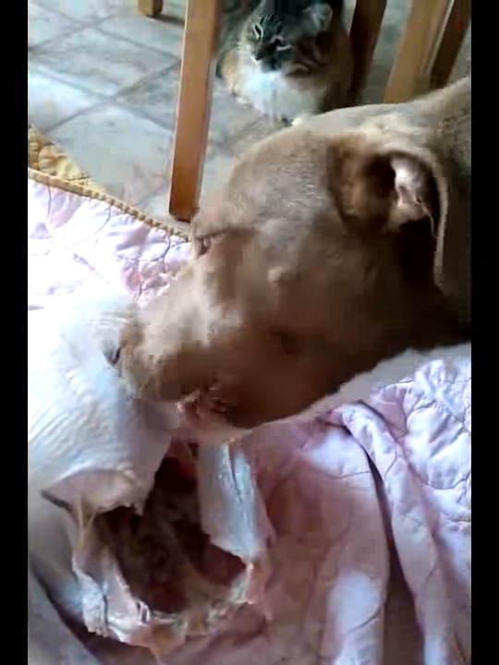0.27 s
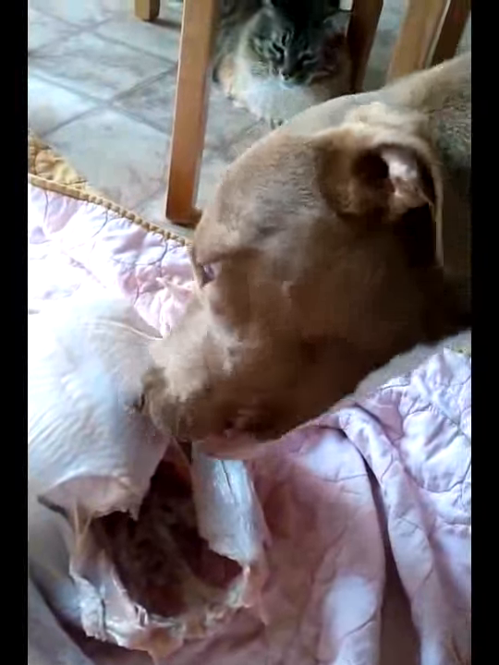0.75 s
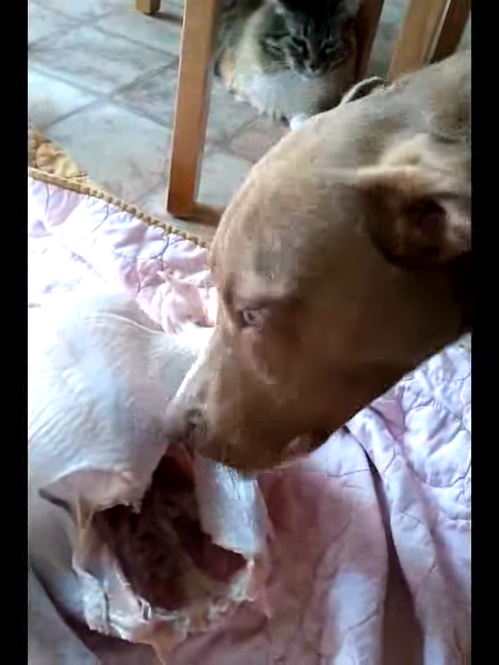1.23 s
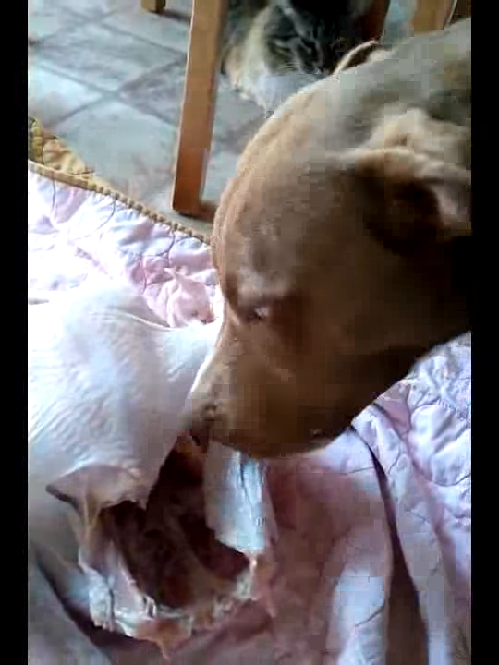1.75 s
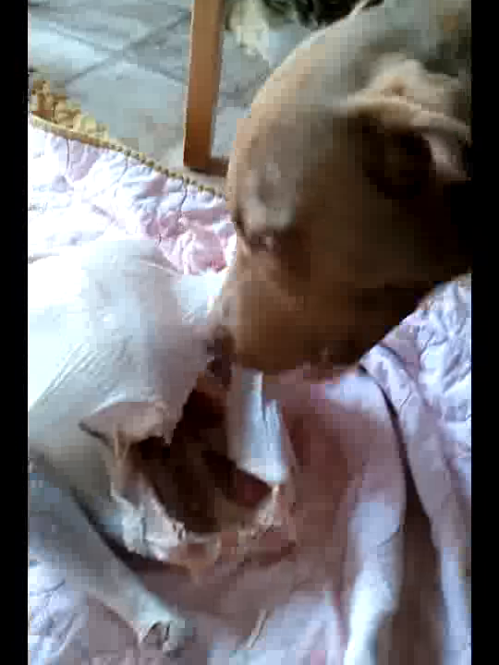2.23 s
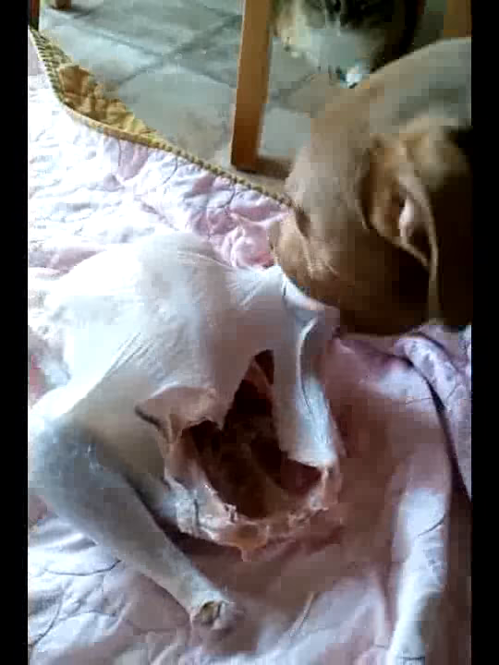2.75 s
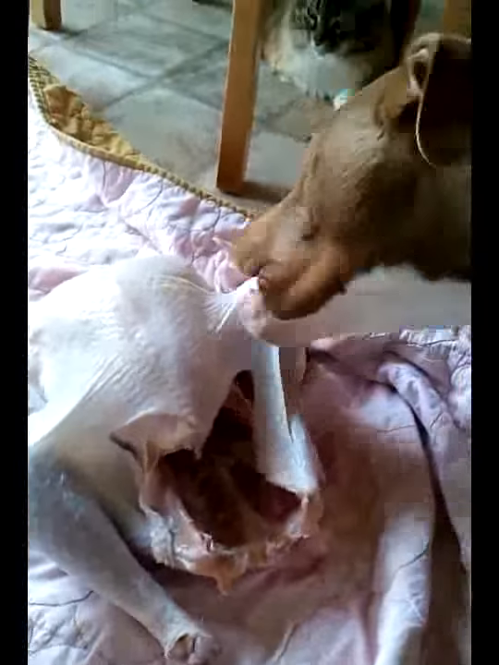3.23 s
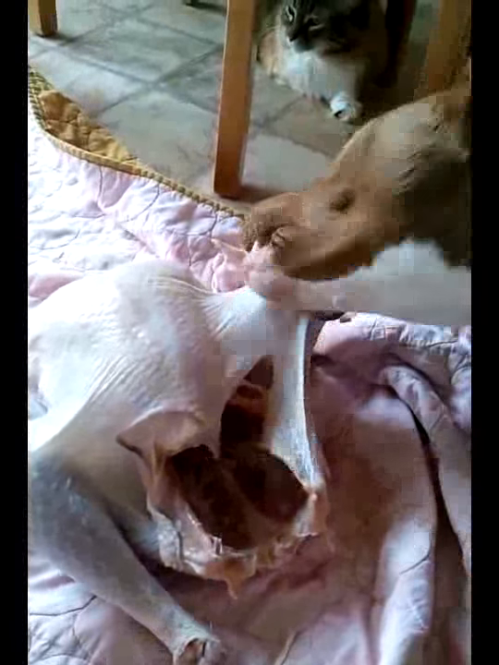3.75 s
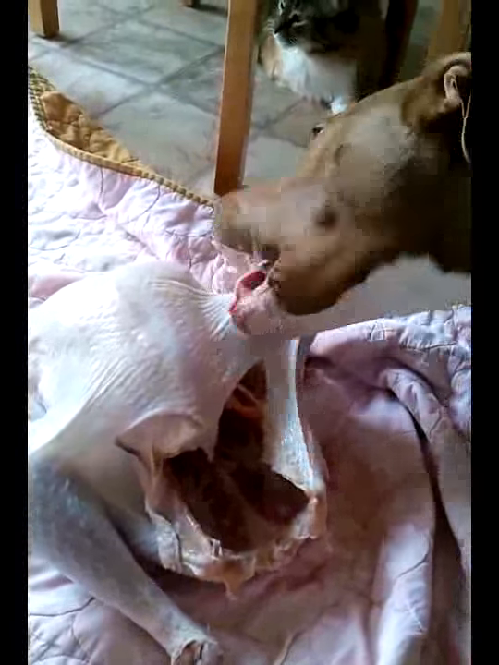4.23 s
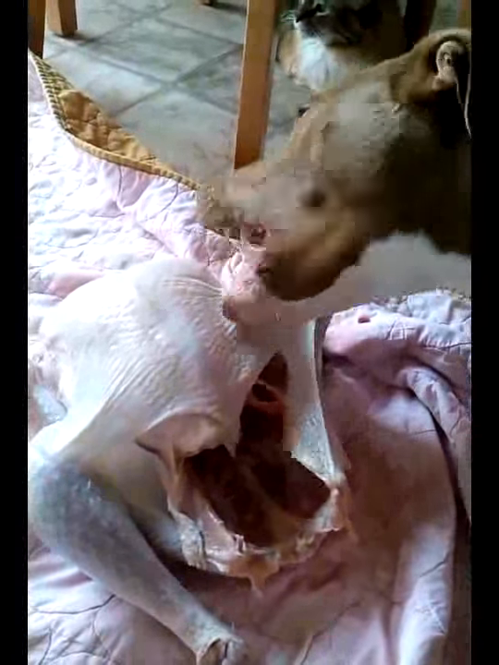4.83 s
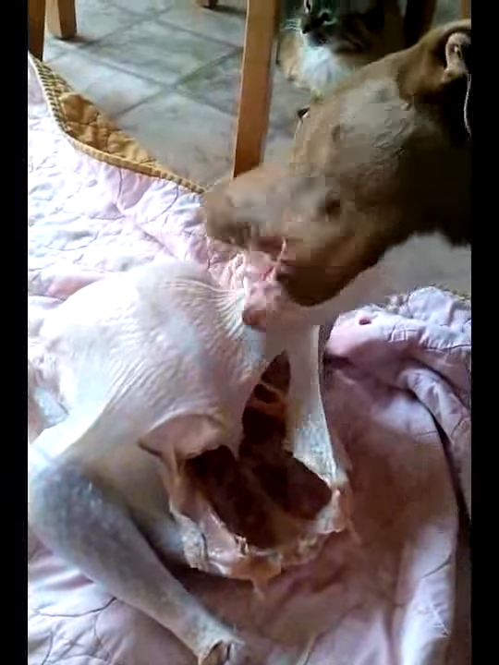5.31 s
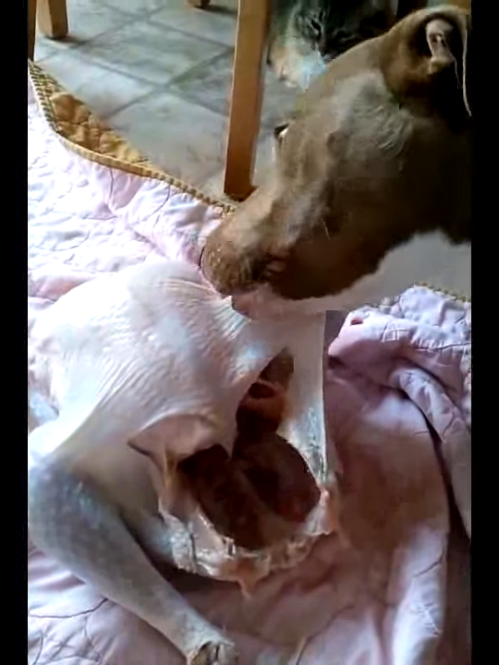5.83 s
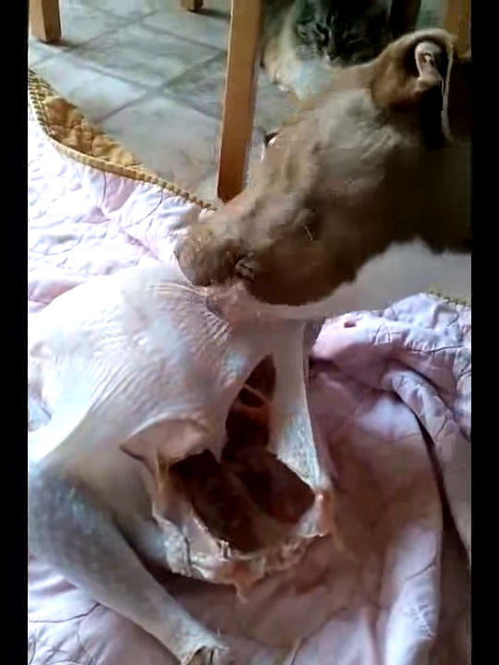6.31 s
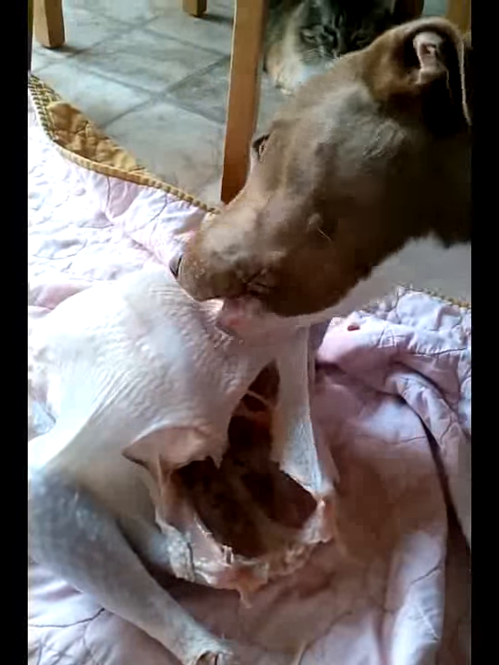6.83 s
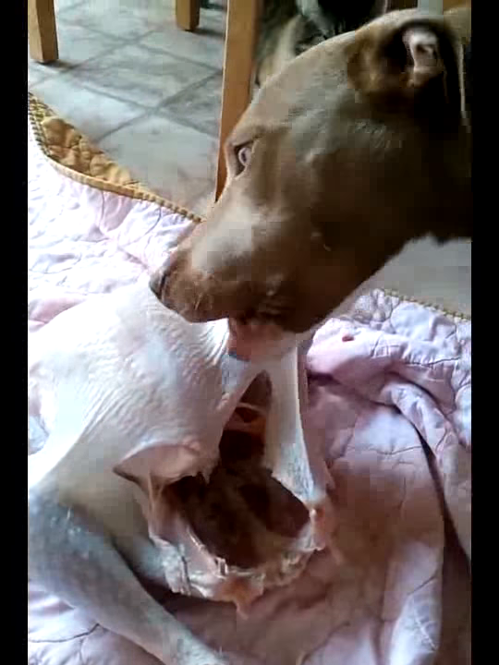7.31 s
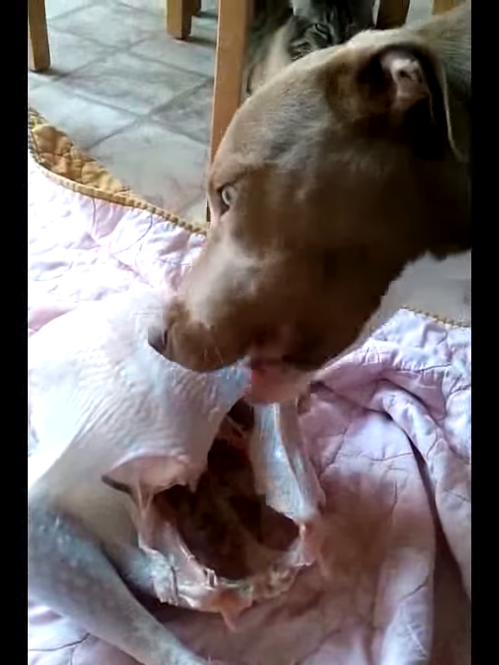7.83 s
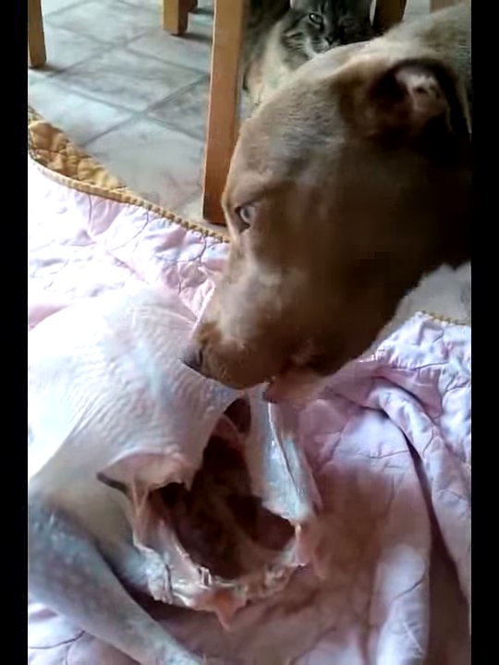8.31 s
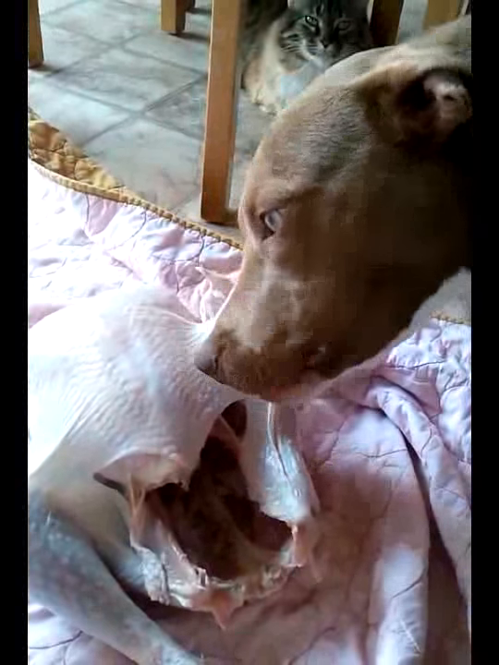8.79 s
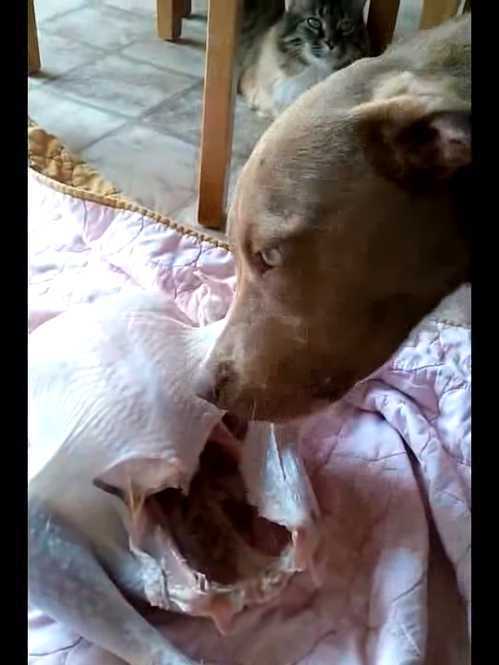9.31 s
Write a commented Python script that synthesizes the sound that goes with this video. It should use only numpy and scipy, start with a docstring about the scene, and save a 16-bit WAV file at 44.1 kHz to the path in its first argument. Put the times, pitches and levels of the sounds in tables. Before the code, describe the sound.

A dog's mouth works at raw meat and bone: bright, dry clicks, hollow lip smacks, fizzing wet crackle and squelches. Loud splintering snaps distort the small microphone at the start and in clusters around the middle, with short tile echoes. A brief thin, raspy squeak rises in the background. Later the smacking grows busier, without big cracks, over soft room noise and a gently pulsing mains hum.

```python
"""Dog gnawing raw poultry

A dog gnaws raw poultry on a quilt in a tiled kitchen, close to a phone. Bones crack and overload
the phone, lips and tongue smack: noise puffs ring resonances. Wet meat crackles: random pops.
A squeak glides up across the room: swept sines and rasp. Mains hum beats over shaped room noise."""
import sys
import numpy as np
from scipy import signal
from scipy.fft import rfft, irfft
from scipy.io import wavfile
from scipy.ndimage import uniform_filter1d

SR = 44100
rng = np.random.default_rng(int(sys.argv[2]) if len(sys.argv) > 2 else 0)


def put_to_file(sound):
    """Save the sound as 16-bit audio at rate SR, in the file named by the first command-line argument."""
    columns = np.atleast_2d(sound).T  # one column per channel
    safe = np.clip(columns, -1, 1)
    whole_steps = np.round(safe * 32767)
    wavfile.write(sys.argv[1], SR, whole_steps.astype(np.int16))


N = 421155  # samples

# Levels are ahead of mixing and microphone; PORT_DB is added where noted in the code.
# Bone cracks: t/s, splinter peak/dB, splinter f/Hz, mouth f/Hz, mouth re splinter/dB,
# thud re splinter/dB, bone ring re splinter/dB, decay constant/ms
BONE_CRACKS = [(0.0455, 7, 4900, 1390, -23, -15.5, -4, 3.7), (0.0962, 7.5, 5100, 840, -18.5, -28, -23, 3.1),
               (0.1675, 10.5, 5100, 1806, -19.5, -26.5, -38, 2.6),
               (1.35, -3.5, 6200, 1690, -12, -12.5, -34, 2.2),
               (4.2608, 6.5, 5100, 1370, -9.5, -17.5, -15, 2.4),
               (4.2845, 4.5, 5200, 1267, -9.5, -17, -14, 3.3),
               (5.252, 8.5, 6080, 1300, -25.5, -30.5, -30, 2.4),
               (5.2787, 10, 4900, 1330, -13.5, -25.5, -14, 4), (5.324, 9, 5200, 1250, -21, -29, -15, 3.2),
               (5.362, 1, 4960, 1030, -27, -50, -26, 1.5), (5.3833, 11, 4500, 1220, -12, -28, -28, 3.6),
               (5.457, 5.5, 4600, 915, -2.5, -14, 3, 1.41), (5.656, 8, 5260, 1880, -33, -39, -21.5, 10),
               (6.0316, 9.5, 5760, 1284, -20.5, -34.5, -21.5, 2.25),
               (6.0417, 4, 4550, 1280, -19.5, -28, -31, 3), (7.3119, -12.5, 4300, 1250, -14, -4, -36, 2.5),
               (7.3256, 9.5, 4810, 1670, -23.5, -37, -46, 1.5)]
# Smacks and tooth clicks: t/s, click peak/dB, mouth f/Hz, mouth level/dB, decay constant/ms
MOUTH_SMACKS = [(0.244, -29, 2570, -18, 2), (0.345, -23.5, 1260, -48, 6), (0.395, -26, 1700, -42, 3),
                (0.446, -31, 1380, -34, 1.6), (0.543, -41, 507, -27.5, 4), (0.565, -34, 577, -33, 1.2),
                (0.681, -26.5, 600, -43, 3), (0.726, -25, 600, -53, 2.6), (0.746, -28, 600, -60, 1.1),
                (0.752, -18, 374, -55, 3.3), (0.902, -26, 1700, -39, 11.5), (1.032, -23.5, 2520, -33, 1.6),
                (1.127, -29, 3020, -38, 3.7), (1.217, -21.5, 1250, -26.5, 1.3),
                (1.267, -40, 1230, -29, 3.6), (1.275, -46, 546, -31.5, 8.2), (1.358, -27, 2670, -18, 0.98),
                (1.381, -33, 2580, -28, 5), (1.49, -52, 2440, -33, 3.5), (1.538, -28.5, 2620, -39.5, 3.8),
                (1.645, -30, 1170, -41, 4), (1.74, -28, 597, -40.5, 14), (1.798, -26, 600, -55, 3.9),
                (1.877, -24, 524, -32.5, 2.2), (1.922, -18, 295, -38.5, 3.3), (1.947, -29, 595, -48, 1.7),
                (1.964, -35, 2300, -34, 18), (1.988, -18.5, 2200, -32.5, 3.9), (2.056, -44, 1130, -34, 5.5),
                (2.135, -26, 620, -55, 1.9), (2.18, -25, 610, -42, 4.2), (2.451, -23, 283, -34.5, 4.8),
                (2.461, -19, 316, -36, 5.8), (2.472, -32, 1770, -32, 16), (2.525, -20.5, 1820, -43, 3.6),
                (2.889, -40, 646, -32, 6.2), (2.901, -27, 613, -55, 5.8), (3.375, -41, 2880, -37.5, 1.5),
                (3.552, -31, 457, -42.5, 7.1), (3.606, -17, 540, -43, 2.5), (3.629, -14, 1430, -25.5, 0.78),
                (3.706, -23, 600, -58, 3.8), (3.737, -19.5, 600, -54, 3.4), (3.78, -20.5, 530, -55, 2.7),
                (3.875, -20.5, 600, -46, 1.4), (4.109, -24.5, 440, -54, 2.1), (4.122, -14, 1500, -51, 1),
                (4.146, -22, 1260, -27.5, 1.2), (4.236, -7, 1390, -22, 1.3), (4.385, -25, 2570, -26, 4.8),
                (4.484, -22, 1200, -71, 2), (4.565, -15.5, 600, -52, 2.6), (4.659, -12.5, 600, -42, 0.98),
                (4.703, -21, 1200, -35.5, 15), (4.753, -22, 1190, -35.5, 5.1),
                (4.777, -23, 1300, -36.5, 14), (4.903, -16.5, 2820, -48, 3.7),
                (4.982, -21.5, 397, -47, 3.1), (5.028, -20.5, 545, -48, 2.8),
                (5.131, -52, 1080, -32.5, 5.2), (5.175, -24, 654, -40, 2.1), (5.187, -16.5, 1380, -36, 2.3),
                (5.223, -12, 1290, -25.5, 2.3), (5.815, -26, 600, -54, 2.4), (5.844, -25, 600, -64, 0.83),
                (5.855, -26, 600, -58, 1.1), (5.922, -22.5, 363, -47, 6.4), (5.992, -46, 1380, -27, 3.4),
                (6.017, -11, 1380, -36, 2.2), (6.025, -7, 1370, -17, 2.5), (6.106, -10.5, 1360, -47, 2.7),
                (6.187, -12, 370, -44, 1), (6.215, -21, 600, -54, 1.5), (6.324, -16.5, 600, -47, 4.5),
                (6.393, -27, 1210, -32, 2.8), (6.417, -23, 1340, -57, 1.7), (6.431, -22, 1320, -28, 3.3),
                (6.438, -16, 1280, -31, 5.3), (6.46, -28, 1300, -36, 4.3), (6.486, -10, 1300, -40, 1.5),
                (6.499, -18, 1300, -42, 1.5), (6.581, -21, 613, -43.5, 1.8), (6.591, -19, 420, -46, 2.1),
                (6.623, -13.5, 600, -58, 1.7), (6.705, -23, 600, -53, 2.4), (6.714, -14.5, 1080, -39, 3.2),
                (6.735, -27, 2030, -28.5, 5.8), (6.768, -20, 2000, -42, 1.9), (6.836, -22, 1100, -44, 3.3),
                (6.849, -15.5, 1260, -31, 4.8), (6.879, -11, 630, -33, 5.2), (6.918, -14, 1380, -24, 2.9),
                (6.948, -24, 600, -48, 2.6), (6.992, -6.5, 600, -50, 2.1), (7.07, -16.5, 1260, -48, 3.8),
                (7.131, -14.5, 1160, -40, 7.6), (7.16, -31, 2700, -29.5, 5.6), (7.195, -40, 1210, -26, 3.1),
                (7.221, -20.5, 600, -46, 6.7), (7.255, -22, 595, -52, 3.9), (7.273, -11.5, 600, -49, 3),
                (7.495, -29, 2920, -30.5, 9.8), (7.545, -16, 1170, -35.5, 3.4),
                (7.585, -20, 1090, -44, 4.4), (7.597, -43, 1130, -33.5, 4.3),
                (7.624, -17.5, 1230, -64, 1.8), (7.703, -17.5, 510, -23.5, 2.3),
                (7.725, -26, 1470, -27, 15), (7.751, -5, 605, -29.5, 2.7), (7.779, -15.5, 2800, -30.5, 12),
                (7.902, -17.5, 600, -51, 2.6), (7.919, -17, 600, -52, 1.9), (7.93, -11.5, 1260, -37, 4.1),
                (7.943, -14.5, 1430, -31, 6.6), (7.982, -23, 1390, -28.5, 5.9), (8.073, -23.5, 600, -44, 5),
                (8.13, -19, 1470, -22, 16), (8.156, -14.5, 1570, -40, 5.9),
                (8.278, -28.5, 2040, -35.5, 4.9), (8.373, -20, 720, -36.5, 2.1),
                (8.402, -25, 400, -53, 1.1), (8.417, -9.5, 606, -51, 2.3), (8.494, -20, 1310, -25.5, 8.5),
                (8.606, -11, 600, -57, 4), (8.734, -22.5, 1210, -34.5, 3.7), (8.789, -22, 392, -43, 2.3),
                (8.868, -34, 1250, -34, 5.1), (8.878, -16.5, 1310, -27, 55), (8.903, -10.5, 1380, -44, 1.3),
                (8.931, -16, 565, -43, 2.3), (8.971, -27.5, 2190, -25.5, 10), (9.074, -19.5, 1280, -46, 12),
                (9.2, -20.5, 594, -55, 1.1), (9.293, -26, 606, -49, 11), (9.371, -16.5, 574, -29, 2.2),
                (9.383, -17.5, 390, -56, 5.1), (9.471, -19.5, 600, -59, 1.3), (9.487, -16.5, 600, -57, 1.9),
                (9.538, -16, 2220, -42, 2.3)]
# Wet crackle between the smacks: t/s, level/dB
WET_LEVELS = [(0, -56.5), (.13, -38), (.5, -58), (.9, -56), (2.05, -48.5), (2.8, -58), (3.14, -44),
              (3.32, -60.5), (3.56, -48), (3.85, -60), (4.2, -44), (4.5, -51.5), (5.1, -48.5),
              (5.38, -33.5), (5.8, -51.5), (6.12, -37), (6.3, -52), (7.5, -48.5), (8.16, -53.5),
              (9.55, -52)]
# Squelches, wet grain in the hollow of the mouth: t of maximum/s, level/dB,
# swell per 20 dB/ms, sink per 20 dB/ms
MOUTH_SQUELCHES = [(.09, -27, 42, 243), (.18, -39.5, 56, 37), (1.28, -38, 110, 18), (1.36, -41, 44, 200),
                   (2.07, -44.5, 896.5, 93), (2.5, -44, 120, 40), (2.9, -32.5, 31.5, 29),
                   (3.64, -45, 400, 165), (4.15, -33, 27, 100), (4.28, -32, 36, 112), (4.76, -42, 424, 408),
                   (5.13, -42, 98, 64), (5.29, -31, 81, 140), (5.4, -34, 87, 34), (5.45, -33, 94, 117),
                   (6.04, -27, 66, 60), (6.44, -41, 183, 65), (6.91, -42, 461, 115), (7.21, -39.5, 197, 90),
                   (7.33, -29.5, 28.5, 85), (7.61, -34.5, 173, 16), (7.74, -37, 103, 144),
                   (7.98, -58, 296, 64), (8.141, -24, 23, 33), (8.48, -40.5, 137, 82),
                   (8.87, -39, 272.5, 160), (9.39, -47, 300, 150)]
# Squeak glide: t/s, f/Hz, level/dB, rasp re level/dB
SQUEAK_GLIDE = [(2.99, 1334, -60, -11), (3.018, 1465, -44.5, -21), (3.05, 1777, -41.5, 1),
                (3.084, 2300, -42.5, 5.5), (3.11, 2825, -37, -2), (3.14, 3000, -30, -21),
                (3.18, 2984, -35, -6.5), (3.24, 2990, -46, -5), (3.298, 2990, -63, 2)]
# Squeak partials: multiple of the pitch, level re fundamental/dB
SQUEAK_PARTIALS = [(1, 0), (2, -13), (3, -13)]
# Rasp bands of the squeak: f/Hz, width/Hz, relative level/dB
RASP_BANDS = [(2200, 930, -4), (3740, 1100, -5), (5050, 450, -8.5)]
# Hum tones: f/Hz, RMS level/dB
HUM_TONES = [(118.4, -54), (240, -68.5), (300, -64.5), (360, -59.5)]
# Room noise spectrum: f/Hz, relative density/dB
AIR_SPECTRUM = [(25, -29), (64, -7.5), (100, -14), (170, 0), (250, -7), (370, -4), (600, -6), (1000, -13),
                (2000, -14), (3100, -22.5), (5400, -30), (9000, -26.5)]
# Echo of the tiles by band: f/Hz, t60/s, relative level/dB
ROOM_BANDS = [(268, 0.41, 4.5), (600, 0.19, 8), (1190, 0.35, -1.5), (2230, 0.38, 2), (3300, .22, 1),
              (5200, 0.1, -2.5), (8460, 0.17, 2.5)]

AIR_DB = -52
BEAT_PERIOD_S, BEAT_TOP_S, BEAT_SHARE = 0.671, 0.575, 0.42
# Echo patterns crossfade at a steady pace: slowly for mouth, wet sounds and squeak,
# quickly for cracks, whose echo is diffuse
ECHO_PATTERNS, SLOW_TURN_S, QUICK_TURN_S = 8, 0.05, 0.0015
CRACK_ECHO_DB, MOUTH_ECHO_DB, WET_ECHO_DB = -11, -8, -11
SQUEAK_DIRECT_DB, SQUEAK_ECHO_DB = -11, 9.5
# Bubbles in the spit (per fizz band), larger ones in the hollow of the mouth
FIZZ_PER_S, GURGLE_PER_S = 1500, 260
CLICK_HZ, CLICK_LOG_SPREAD = 5030, 0.051
# Faint smacks: click level re the clear smack, floor before the spread, mouth re click
TICKS, TICK_SCATTER_S, TICK_MS = 130, 0.017, 3.6
TICK_DB, TICK_FLOOR_DB, TICK_SPREAD_DB, TICK_MOUTH_DB = -11, -39.5, 0.5, -21.5
# Port: sound outside its resonances is PORT_DB stronger at the source
PORT_LOW_HZ, PORT_LOW_WIDTH_HZ, PORT_LOW_DB = 4480, 270, -7.5
PORT_HIGH_HZ, PORT_HIGH_WIDTH_HZ, PORT_DB = 5286, 1260, 10.5
EDGE_HZ, TOP_HZ = 9000, 16300


def undb(db):
    """dB to amplitude ratio."""
    return 10 ** (np.asarray(db) / 20)


def unit(x):
    """Scale to RMS 1."""
    return x / np.sqrt(np.mean(x ** 2))


def band(x, hz, width_hz):
    """Resonance with gain 1 at its centre."""
    return signal.lfilter(*signal.iirpeak(min(hz, 0.45 * SR), hz / width_hz, fs=SR), x)


def low_pass(x, order, hz):
    """Butterworth low-pass."""
    return signal.sosfilt(signal.butter(order, hz, fs=SR, output="sos"), x)


def burst(noise, decay_ms, hz, q, skirt):
    """A puff of noise swells, dies and rings one steep resonance with a broad skirt; peak 1."""
    t = np.arange(len(noise)) / (SR * max(decay_ms, 0.1) / 1000)  # in decay constants
    puff = noise * np.exp(-t) * (1 - np.exp(-t / 0.05))
    broad = band(puff, hz, hz / 1.02)
    ring = band(broad, hz, hz / q) + skirt * broad
    return ring / np.abs(ring).max()


def add(out, t_s, x):
    """Mix x into out from t_s, cut at the end."""
    i = int(t_s * SR)
    out[i:i + len(x)] += x[:len(out) - i]


def air():
    """Steady room noise: white noise shaped over log frequency."""
    hz, db = np.transpose(AIR_SPECTRUM)
    f = np.maximum(np.arange(N // 2 + 1) * SR / N, 1)
    gain = undb(np.interp(np.log(f), np.log(hz), db))
    return undb(AIR_DB) * unit(irfft(rfft(rng.standard_normal(N)) * gain, N))


def hum():
    """Mains overtones; the lowest has a close neighbour, so it swells and sinks."""
    t = np.arange(N) / SR
    tones = [np.sqrt(2) * undb(db) * np.exp(2j * np.pi * hz * t) for hz, db in HUM_TONES]
    neighbour = BEAT_SHARE * np.exp(2j * np.pi * (t - BEAT_TOP_S) / BEAT_PERIOD_S)
    tones[0] = tones[0] * (1 + neighbour)
    return sum(tones).imag


def room(x, turn_s):
    """Diffuse echo of the tiles: noise dying band by band; patterns crossfade every turn_s."""
    t = np.arange(SR // 2) / SR
    turn = np.arange(N) / SR / turn_s
    out = 0
    for k in range(ECHO_PATTERNS):
        tail = 0
        for hz, t60_s, db in ROOM_BANDS:
            noise = band(rng.standard_normal(len(t)), hz, 0.54 * hz)
            tail = tail + undb(db - 60 * t / t60_s) * noise
        tail = tail * np.clip((t - 0.002) / 0.0078, 0, 1)  # starts after the first wall
        tail = tail / np.sqrt(np.sum(tail ** 2))
        distance = np.minimum(np.abs((turn - k) % ECHO_PATTERNS - 1), 1)
        share = np.cos(np.pi / 2 * distance)
        out = out + signal.fftconvolve(share * x, tail)[:N]
    return out


def squeak():
    """A thin whistle with overtones glides up and holds, with a breathy rasp around it."""
    t = np.arange(N) / SR
    t_s, hz, db, rasp_db = np.transpose(SQUEAK_GLIDE)
    wobble = 1 + 0.013 * unit(uniform_filter1d(rng.standard_normal(N), size=150))
    phase = 2 * np.pi * np.cumsum(np.interp(t, t_s, hz) * wobble) / SR
    whistle = sum(undb(g) * np.sin(k * phase) for k, g in SQUEAK_PARTIALS)
    breath = rng.standard_normal(N)
    rasp = sum(undb(g) * unit(band(band(breath, f, w), f, w)) for f, w, g in RASP_BANDS)
    rasp = rasp * undb(np.interp(t, t_s, rasp_db))
    level = undb(np.interp(t, t_s, db, -200, -200))
    return low_pass(level * (rasp + whistle), 6, 6800)  # far off and dull


def bubble_pops(rate_per_s):
    """Bubbles burst at random, a few much larger than the rest."""
    hits = rng.random(N) < rate_per_s / SR
    return hits * undb(3.1 * rng.exponential(size=N)) * rng.standard_normal(N)


def crackle(smack):
    """Tiny bubbles burst in meat and spit, louder just after a smack; larger ones squelch."""
    t = np.arange(N) / SR
    level = undb(np.interp(t, *np.transpose(WET_LEVELS)))
    fade = np.exp(-1 / (SR * 0.018))
    smack_level = np.sqrt(signal.lfilter([1 - fade], [1, -fade], smack ** 2))
    low_fizz = unit(band(bubble_pops(FIZZ_PER_S), 5000, 2500))
    high_fizz = unit(band(bubble_pops(FIZZ_PER_S), 6600, 2100))
    fizz = unit(low_fizz + 0.69 * high_fizz)

    swells = 0
    for t_s, db, swell_ms, sink_ms in MOUTH_SQUELCHES:
        drop = 1000 * np.maximum((t_s - t) / swell_ms, (t - t_s) / sink_ms)  # in steps of 20 dB
        swells = swells + undb(db - 20 * drop)
    gurgle = unit(band(band(bubble_pops(GURGLE_PER_S), 1255, 240), 1400, 800))
    return fizz * (level + 0.062 * smack_level) + gurgle * swells


def ticks():
    """Rows for faint smacks: shortly before or after a clear one, weaker, any shape of mouth."""
    which, mouth = rng.random((TICKS, 2)).T
    lag, size = rng.standard_normal((TICKS, 2)).T
    near = np.array(MOUTH_SMACKS)[(which * len(MOUTH_SMACKS)).astype(int)]
    t_s = np.clip(near[:, 0] + TICK_SCATTER_S * lag, 0, N / SR)
    db = np.maximum(near[:, 1] + TICK_DB, TICK_FLOOR_DB) + TICK_SPREAD_DB * size
    mouth_hz = 350 * 7 ** mouth
    return list(zip(t_s, db, mouth_hz, db + TICK_MOUTH_DB, np.full(TICKS, TICK_MS)))


def smacks():
    """A film of spit parts in a quick run of ticks; the open mouth gives it a hollow note."""
    out = np.zeros(N)
    rows = MOUTH_SMACKS + ticks()
    chance = rng.standard_normal((len(rows), 4, 1600))
    for (t_s, db, mouth_hz, mouth_db, ms), (hiss, puff, flesh, tear) in zip(rows, chance):
        click_hz = CLICK_HZ * np.exp(CLICK_LOG_SPREAD * tear[0])
        grain = np.exp(0.56 * unit(uniform_filter1d(tear, size=24)))  # the film tears unevenly
        click = burst(hiss * grain, ms, click_hz, q=7.2, skirt=0.47)
        mouth = burst(puff * grain, ms, mouth_hz, q=11.0, skirt=0.23)
        mouth = mouth + 0.31 * burst(flesh * grain, ms, 1100, q=0.32, skirt=0.4)
        add(out, t_s, undb(db) * click + undb(mouth_db + PORT_DB) * mouth)
    return out


def cracks():
    """Bone splinters and the carcass rings along; returned apart, the note of the mouth."""
    bone, hollow = np.zeros(N), np.zeros(N)
    chance = rng.standard_normal((len(BONE_CRACKS), 5, 2048))
    for row, noise in zip(BONE_CRACKS, chance):
        t_s, db, splinter_hz, mouth_hz, mouth_db, thud_db, ring_db, ms = row
        # fibres give way one after another
        noise = noise * np.exp(0.5 * unit(uniform_filter1d(noise[4], size=40)))
        splinter = burst(noise[0], ms, splinter_hz, q=5.5, skirt=0.29)
        mouth = burst(noise[1], ms, mouth_hz, q=12, skirt=0.17)
        thud = undb(thud_db) * burst(noise[2], ms, 612, q=1.0, skirt=0.33)
        ring = undb(ring_db) * burst(noise[3], ms, 2960, q=0.82, skirt=0.24)
        add(bone, t_s, undb(db) * (splinter + undb(PORT_DB) * (thud + ring)))
        add(hollow, t_s, undb(db + mouth_db + PORT_DB) * mouth)
    return bone, hollow


def scene():
    """Direct sound and tile echo over hum and room noise."""
    background = undb(PORT_DB) * (hum() + air())
    call = squeak()
    smack = smacks()
    wet = smack + crackle(smack)
    bone, mouth = cracks()
    crack_echo = room(undb(CRACK_ECHO_DB) * bone, QUICK_TURN_S)
    sends = undb(MOUTH_ECHO_DB) * mouth + undb(WET_ECHO_DB) * wet + undb(SQUEAK_ECHO_DB) * call
    echo = crack_echo + room(sends, SLOW_TURN_S)
    direct = bone + mouth + wet + undb(SQUEAK_DIRECT_DB) * call
    return (direct + echo + background)[None]


def record(dry):
    """The port has two resonances, the capsule ends its range, the converter clips."""
    port = undb(PORT_LOW_DB) * band(dry, PORT_LOW_HZ, PORT_LOW_WIDTH_HZ)
    port = port + band(dry, PORT_HIGH_HZ, PORT_HIGH_WIDTH_HZ) + undb(-PORT_DB) * dry
    capsule = low_pass(low_pass(port, 2, 7500), 20, EDGE_HZ)
    clipped = capsule / (1 + np.abs(capsule) ** 6) ** (1 / 6)
    clipped = low_pass(clipped, 1, 12000)
    return signal.sosfilt(signal.ellip(10, 0.2, 80, TOP_HZ, fs=SR, output="sos"), clipped)


dry = scene()
out = record(dry)
put_to_file(out)
```